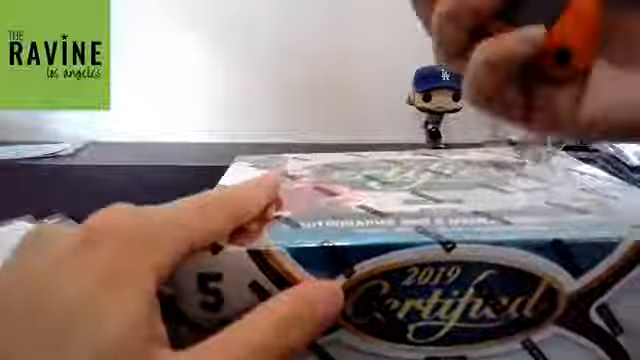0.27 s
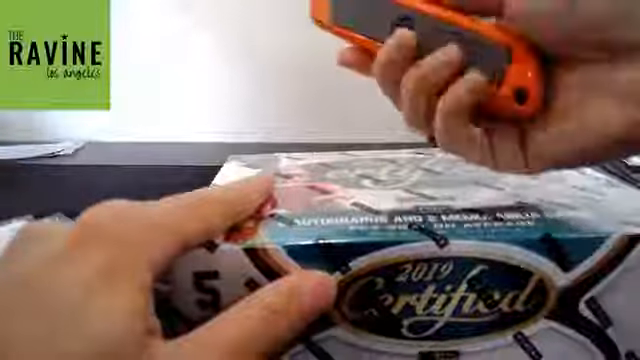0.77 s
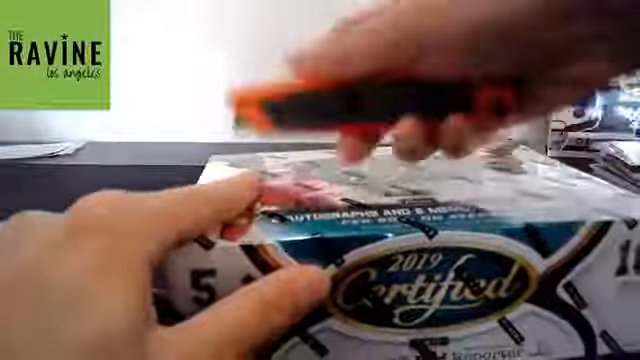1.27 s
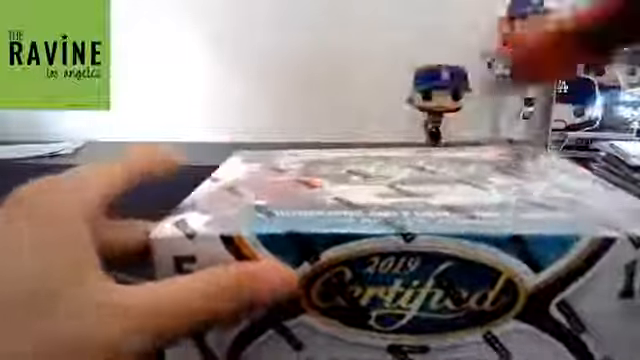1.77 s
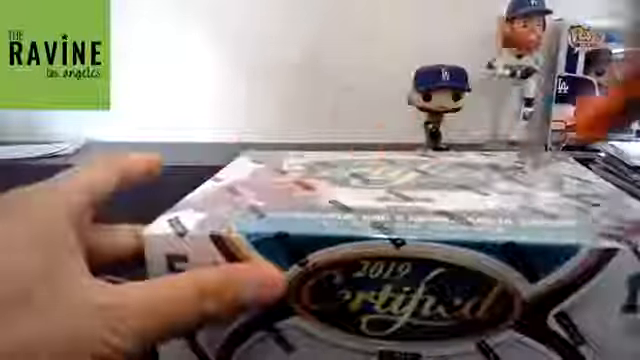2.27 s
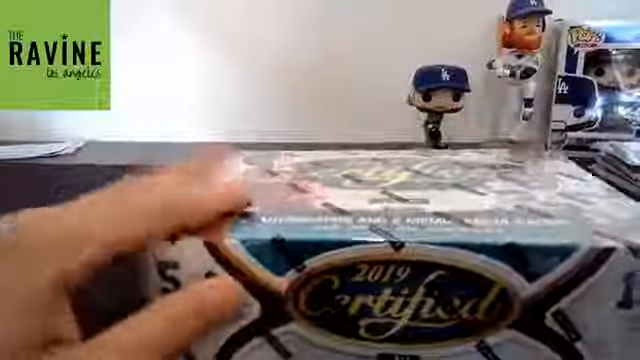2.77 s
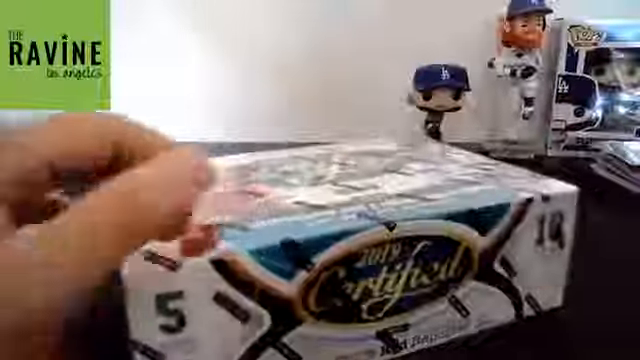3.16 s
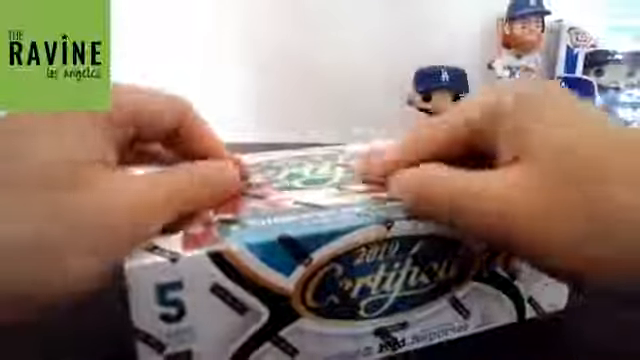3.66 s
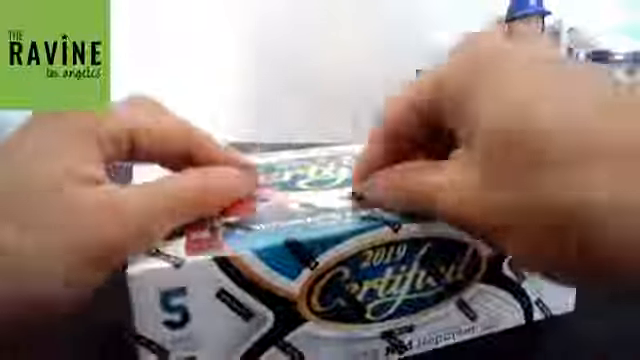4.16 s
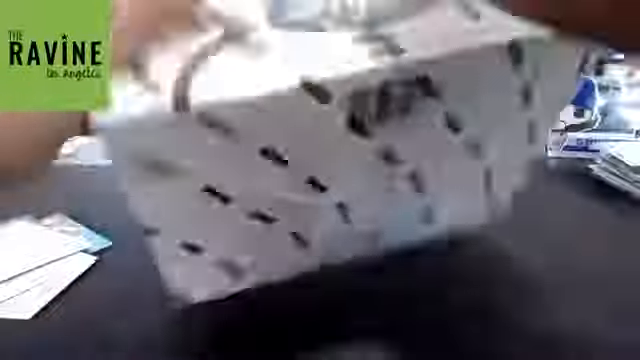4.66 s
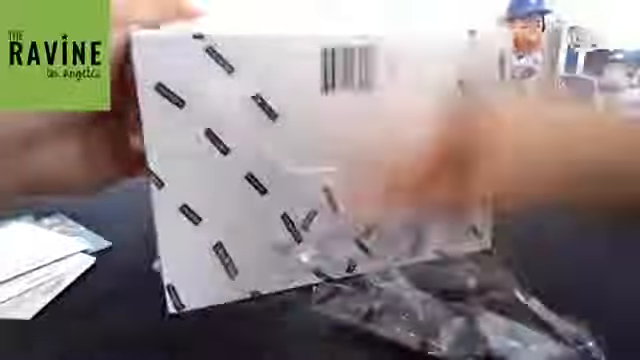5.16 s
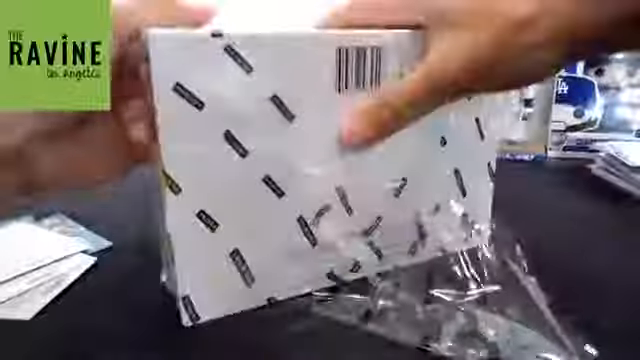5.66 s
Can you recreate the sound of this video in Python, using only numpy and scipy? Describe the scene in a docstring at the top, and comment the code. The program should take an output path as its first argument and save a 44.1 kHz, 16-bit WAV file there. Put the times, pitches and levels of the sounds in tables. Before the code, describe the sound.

Close microphone, small reflective room with very quiet room tone. Bright ratchety knife clicks come first, then two gritty cutting rasps, the second brighter and ending in a hard knock. After the closing clicks come a hollow box thump, squeaky sliding, fine plastic crackle, a sharp film snap, then sparse bumps, brushing skin and small crinkles.

```python
"""A utility knife is clicked open, drawn twice through the shrink film on a cardboard box and clicked shut:
noise flurries excite damped modes of the plastic, and random slips of the blade make the two rasps.
Fingers then slide the box on the desk, pick at the film, snap it and tip the box over: coloured grit,
friction noise, broad snaps and knocks on the modes of the box. A small lively room answers with decaying
noise, over room tone, faint tones of fixed pitch and one brief breathy whistle of resonant noise."""
import sys
import numpy as np
from scipy import signal
from scipy.fft import rfft, irfft, next_fast_len
from scipy.io import wavfile

SR = 44100
rng = np.random.default_rng(int(sys.argv[2]) if len(sys.argv) > 2 else 0)


def voltage_ratio(decibels):
    """Convert decibels (scalar or array-like) to amplitude ratios, 20 dB per decade."""
    exponent = np.asarray(decibels, float) / 20
    return 10 ** exponent


def bounce(signal):
    """Save signal as a 16-bit WAV file at the path given by the first command-line argument."""
    frames = np.transpose(np.atleast_2d(signal))
    limited = np.clip(frames, -1, 1)
    pcm = np.round(limited * 32767).astype(np.int16)
    wavfile.write(sys.argv[1], SR, pcm)


N = 261513   # samples

# Sharp clicks in the knife's plastic voice, mostly from its slider: start_s, peak_db
KNIFE_CLICKS = [(0.008, -58), (0.0549, -46.5), (0.142, -60), (0.2006, -49), (0.2495, -19.5), (0.362, -40),
                (0.3772, -39), (0.808, -68), (0.856, -43), (0.8655, -46.5), (0.878, -64), (0.9456, -28),
                (1.084, -50.5), (1.725, -47.5), (2.3842, -26), (2.419, -29.5)]
# Modes of the plastic knife: pitch_hz, gain_db
KNIFE_MODES = [(1050, -19), (2400, -1), (3400, 7.5), (4700, 9), (7800, 7.5), (10000, -2), (13500, -34)]
# Blade pressure through film and over card, one table a stroke: time_s, level_db
CUT_STROKES = [
    [(1.35, -84), (1.43, -53), (1.49, -50.5), (1.505, -38), (1.61, -41), (1.635, -69), (1.68, -59)],
    [(1.97, -80), (2.02, -53.5), (2.065, -38.5), (2.215, -42), (2.225, -51), (2.27, -78)],
]
# Relative colour of the blade's rasp: frequency_hz, gain_db
RASP_COLOUR = [(150, -7), (280, -14.5), (480, -0.5), (662, -5), (875, 6), (1020, -1.5), (1240, 4),
               (1700, 1), (2910, -4), (5730, -14.5), (6360, -12), (16000, -38)]
# Spectral tilt of the rasp: dull as the blade bites, brighter as it gathers speed
BITE_TILT_DB_PER_OCTAVE, TILT_RISE_DB_PER_OCTAVE_PER_S = -11.5, 80.5
# Tilt at full speed, one value a stroke, the second being the faster: tilt_db_per_octave
FULL_SPEED_TILT = [-0.43, 2.5]
RAGGED_DB = 2.5   # spread of each octave's own wavering

# Snaps of the film: start_s, peak_db, centre_hz
FILM_SNAPS = [(1.3379, -40, 1670), (1.4238, -41, 1700), (1.9599, -38.5, 1440), (2.006, -53, 1200),
              (2.7795, -46.5, 3130), (2.9524, -42, 6600), (3.3478, -43, 2480), (3.3873, -39, 10300),
              (3.4104, -32.5, 10500), (3.489, -36.5, 1920), (3.5015, -38, 3240), (3.7898, -43.5, 7000),
              (3.956, -44, 4150), (3.9763, -34, 5500), (4.2864, -17.5, 4130), (4.4584, -39, 1960),
              (4.5196, -48, 1750), (4.555, -41.5, 1620), (4.6103, -32.5, 3500), (4.6586, -47, 1500),
              (4.745, -47, 2500), (4.815, -39.5, 8150), (4.9155, -38.5, 4000), (5.0569, -42, 2650),
              (5.295, -33, 2080), (5.44, -53.5, 6000), (5.5225, -45.5, 1650), (5.7853, -46, 2820)]
# Fingers tugging the film: start_s, held_s, gain_db
FILM_TUGS = [(2.62, 0.19, -70), (3.42, 0.32, -75), (3.79, 0.036, -58.5), (3.98, 0.047, -59.5),
             (4.3, 0.021, -55), (4.5, 0.38, -72.5), (4.83, 0.13, -64), (5.02, 0.16, -75), (5.3, 0.11, -68),
             (5.63, 0.015, -68.5), (5.76, 0.036, -73.5), (5.88, 0.026, -75.5)]
TUG_RISE_DB_PER_S, TUG_FALL_DB_PER_S = 900, 95
# Relative colour of the film's crackle: frequency_hz, gain_db
FILM_COLOUR = [(1470, -13), (2500, 1.5), (2720, 1), (5350, -3), (8530, 3), (13200, -11.5), (16000, -13.5)]
CREASES_PER_S, CREASES_DB = 60, -0.5   # mean rate for each fold size; level against the fine crackle
# Hands gripping and shifting the box, with its rumble on the desk: start_s, held_s, rumble_db
HAND_GRIPS = [(2.55, 0.5, -67.5), (3.25, .65, -67), (4.1, 0.035, -56.5), (4.5, 0.05, -55.5),
              (4.76, .04, -73), (5.01, .05, -55), (5.38, .04, -57.5), (5.68, 0.079, -69)]
GRIP_RISE_DB_PER_S, GRIP_FALL_DB_PER_S = 92, 86
# Relative colour of skin brushing card: frequency_hz, gain_db
SKIN_COLOUR = [(350, -18.5), (750, -3.5), (1400, -12), (2500, -11), (4500, -25.5)]
# Skin level at a firm grip, the share of the grip's swing in dB it follows, and that grip's rumble level
SKIN_DB, SKIN_FOLLOWS, FIRM_GRIP_DB = -66, 0.43, -59.5

# Pushes of the film-wrapped box over the desk: start_s, held_s, level_db
BOX_PUSHES = [(2.62, 0.02, -58.5), (2.8, 0.21, -69.5), (3.23, 0.38, -66), (3.55, 0.073, -66)]
PUSH_RISE_DB_PER_S, PUSH_FALL_DB_PER_S = 287.5, 102
# Bands in which sliding friction sings: centre_hz, width_hz, level_db
SLIDE_BANDS = [(2340, 1400, -4), (3240, 980, 3.5), (4920, 980, -1.5), (6600, 1200, -6.5), (8750, 1500, -7)]
# Knocks on the box, with the pitch the struck spot favours: start_s, peak_db, pitch_hz, contact_ms
BOX_KNOCKS = [(1.341, -39.5, 470, 1.63), (1.424, -40.5, 493, 1.25), (1.961, -34, 506, 2.2),
              (2.195, -20, 505, 0.84), (2.949, -17.5, 334, 0.93), (2.953, -24, 159, 2.54),
              (2.958, -26, 496, 1.26), (3.19, -43, 220, 6), (3.347, -41.5, 245, 1.1),
              (3.492, -29, 220, 3.67), (4.073, -38, 132, 4.5), (4.287, -23.5, 295, 2.36),
              (4.493, -28.5, 390, 0.31), (4.719, -43.5, 302, 2.8), (4.743, -46.5, 300, 3.5),
              (4.762, -40, 190, 4), (4.914, -35.5, 436, 2.7), (4.992, -36.5, 233, 2.9),
              (5.012, -35, 216, 5.3), (5.293, -45, 710, 1.9), (5.358, -47, 262, 7.2), (5.4, -42, 132, 4),
              (5.519, -44.5, 405, 1)]
# Modes of the box: pitch_hz, gain_db
BOX_MODES = [(105, 8.5), (135, -1.5), (168, 1), (195, -2.5), (228, -0.5), (269, -2), (307, 9), (436, 16.5),
             (500, 12), (600, 8.5), (700, 17.5), (870, -4), (1250, -15)]

# One faint, breathy whistle: start_s, held_s, level_db
WHISTLE_BREATH = [(0.52, 0.049, -76)]
WHISTLE_HZ = 1650
# Reverberation time of the room: frequency_hz, t60_s
ROOM_DECAY = [(100, 0.41), (500, 0.57), (1500, 0.44), (4000, 0.69), (12000, 0.44)]
# Echo energy of the room: frequency_hz, energy_db
ROOM_ECHO = [(100, -6.5), (500, -2.5), (1500, -4), (4000, -5.5), (12000, -7)]
# Relative colour of the room tone: frequency_hz, gain_db
AIR_COLOUR = [(15, -74), (25, -18.5), (200, -11.5), (394, -18.5), (451, -11.5), (489, -23), (1260, -23),
              (16000, -45)]
AIR_DB = -74
# Faint background tones, levels before a common lift: pitch_hz, level_db
FAINT_TONES = [(1292, -89.5), (1577, -87), (2832, -89)]


def knife(hit):
    """Modal radiation: well-damped plastic modes ring, but so small a body gives no bass."""
    modes = 0
    for k, (hz, db) in enumerate(KNIFE_MODES):
        modes = modes + (-1) ** k * voltage_ratio(db) * ring(hit, hz, 2.8 / hz)
    return signal.sosfilt(signal.butter(2, 1300, "high", fs=SR, output="sos"), modes)


def cuts():
    """Stick-slip: the blade stutters through film and card; speed tilts the rasp to the treble."""
    rasp = colour(grit(5000, spread_db=3.0, clump_db=1.6, clump_rate=16.7), RASP_COLOUR)
    tilts = []
    for stroke, full_tilt in zip(CUT_STROKES, FULL_SPEED_TILT):
        since_bite = np.maximum(np.arange(N) / SR - stroke[0][0], 0)
        tilt = BITE_TILT_DB_PER_OCTAVE + TILT_RISE_DB_PER_OCTAVE_PER_S * since_bite
        tilts.append(np.minimum(tilt, full_tilt))
    out = 0
    for k, hz in enumerate(250 * 2. ** np.arange(7)):
        octave = band_pass(rasp, hz / 2 ** .5, hz * 2 ** .5, order=2)
        octaves_up = np.log2(hz / 1000)
        gain = sum(voltage_ratio(in_time(stroke) + tilt * octaves_up) for stroke, tilt in zip(CUT_STROKES, tilts))
        # alternating signs join neighbouring octaves without a gap
        out = out + (-1) ** k * gain * voltage_ratio(RAGGED_DB * drift(32)) * octave
    return out


def crease(hit, hz):
    """Snap-through: a flipping crease is broad about a centre set by fold size, with little far above."""
    broad = band_pass(hit, hz / 14.0, hz * 1.92, order=1)
    broad = signal.sosfilt(signal.butter(1, min(hz * 4.0, .45 * SR), fs=SR, output="sos"), broad)
    return broad + voltage_ratio(-21.5) * ring(hit, hz, 3.2 / hz)


def creases():
    """Random snap-through: lone folds of five sizes pop, each a short ragged flurry."""
    t = np.arange(256) / SR
    out = 0
    for hz in np.geomspace(1800, 9000, 5):
        flurry = rng.standard_normal(256) * np.exp(-t / 0.0026)
        moments = grit(CREASES_PER_S, spread_db=3.0, clump_db=4.0, clump_rate=14)
        pops = signal.fftconvolve(moments, flurry)[:N]
        out = out + rms_one(crease(pops, hz))
    return rms_one(out)


def hands():
    """Granular friction: film crackles finely, skin brushes the card, and the box drags on the desk."""
    tug = gestures(FILM_TUGS, TUG_RISE_DB_PER_S, TUG_FALL_DB_PER_S)
    film = colour(grit(3000, spread_db=2.0, clump_db=0.5, clump_rate=37), FILM_COLOUR)
    film = film + voltage_ratio(CREASES_DB) * creases()
    grip = gestures(HAND_GRIPS, GRIP_RISE_DB_PER_S, GRIP_FALL_DB_PER_S)
    skin = colour(grit(1500, spread_db=3.0, clump_db=5.0, clump_rate=18), SKIN_COLOUR)
    brush = voltage_ratio(SKIN_DB) * (grip / voltage_ratio(FIRM_GRIP_DB)) ** SKIN_FOLLOWS
    drag = grit(1500, spread_db=2.0, clump_db=3.5, clump_rate=42)
    desk = rms_one(box(drag, 228, spread_db=1.0))
    return tug * film + brush * skin + grip * desk


def slide():
    """Friction-driven resonance: smooth rubbing noise sings in a few steady bands."""
    rub = rng.standard_normal(N) * voltage_ratio(1.5 * drift(15))
    bands = 0
    for hz, width_hz, db in SLIDE_BANDS:
        t60 = np.log(1000) / np.pi / width_hz
        bands = bands + voltage_ratio(db) * rms_one(ring(ring(rub, hz, t60), hz, t60))
    return gestures(BOX_PUSHES, PUSH_RISE_DB_PER_S, PUSH_FALL_DB_PER_S) * rms_one(bands)


def knocks():
    """Contact time: a hard blow is one short push; a soft one is a rough push spread over its contact."""
    out = np.zeros(N + SR)
    for s, peak_db, spot_hz, contact_ms in BOX_KNOCKS:
        t = np.arange(SR // 4) / SR / (contact_ms / 1000)   # in contact times
        push = 0.83 * (t < 1) / contact_ms
        blow = t * np.exp(-t) * (rng.standard_normal(len(t)) + push)
        wide = 1 + 2.16 / contact_ms   # a soft push stirs only the panels near its own pitch
        blow = band_pass(blow, spot_hz / wide, spot_hz * wide, order=1)
        knock = box(blow, spot_hz, spread_db=0.5)
        at = round(s * SR)
        out[at:at + len(t)] += voltage_ratio(peak_db) * knock / np.abs(knock).max()
    return out[:N]


def box(x, spot_hz, spread_db):
    """Modal excitation: modes near the struck spot's pitch are favoured; higher modes die sooner."""
    out = 0
    for hz, db in BOX_MODES:
        off_spot_db = -9.1 * np.log2(hz / spot_hz) ** 2
        gain = voltage_ratio(db + off_spot_db + rng.normal(0, spread_db))
        out = out + gain * ring(x, hz, 0.63 / np.sqrt(hz))
    return out


def cracks(events, body, length_ms):
    """Direct and diffuse sound: a crack is a ragged flurry nearby; the walls get its mean colour."""
    t = np.arange(2048) / SR / (length_ms / 1000)
    near, far = np.zeros((2, N + len(t)))
    for s, peak_db, *pitch in events:
        flurry = body(rng.standard_normal(len(t)) * np.sqrt(t) * np.exp(-1.5 * t), *pitch)
        mean = body(1. * (t == 0), *pitch)   # response to a unit click
        gain = voltage_ratio(peak_db) / np.abs(flurry).max()
        at = round(s * SR)
        near[at:at + len(t)] += gain * flurry
        far[at:at + len(t)] += gain * mean * np.std(flurry) / np.std(mean)
    return np.array([near[:N], far[:N]])


def whistle():
    """Resonant filtering: noise passed twice through a narrow resonance gives a breathy pitch."""
    tone = ring(ring(rng.standard_normal(N), WHISTLE_HZ, 0.0087), WHISTLE_HZ, 0.0087)
    return gestures(WHISTLE_BREATH, rise_db_per_s=304, fall_db_per_s=150) * rms_one(tone)


def room(x):
    """Reverberation: echoes build up over the first wall distances, then each octave decays at its rate."""
    t = np.arange(SR) / SR
    tail = 0
    for hz in 90 * 2. ** np.arange(8):
        octave = band_pass(rng.standard_normal(SR), hz / 2 ** .5, hz * 2 ** .5, order=2)
        build_up = np.clip(t / 0.0043, 0, 1)
        octave = octave * voltage_ratio(-60 * t / at_hz(ROOM_DECAY, hz)) * build_up
        share = np.sqrt(hz * np.sqrt(2) / SR / SR)   # scales by the octave's nominal width
        tail = tail + voltage_ratio(at_hz(ROOM_ECHO, hz)) * rms_one(octave) * share
    return signal.fftconvolve(x, tail)[:N]


def air():
    """Stationary background: coloured noise with faint tones, fixed in pitch and wavering in level."""
    t = np.arange(N) / SR
    tones = 0
    for hz, db in FAINT_TONES:
        tones = tones + voltage_ratio(db + 1.5 + 1.8 * drift(5.6)) * np.sin(2 * np.pi * hz * t)
    return voltage_ratio(AIR_DB) * colour(rng.standard_normal(N), AIR_COLOUR) + tones


def ring(x, hz, t60):
    """Damped resonance: a unit click sets a sine of height 1 ringing; t60 in s."""
    r, w = voltage_ratio(-60 / (t60 * SR)), 2 * np.pi * hz / SR
    return signal.lfilter([0, np.sin(w)], [1, -2 * r * np.cos(w), r * r], x + 1e-18)


def grit(per_s, spread_db, clump_db, clump_rate):
    """Random impulses: tiny slips of very uneven size, coming in clumps."""
    sizes = voltage_ratio(spread_db * np.minimum(rng.exponential(1, N), 5)) * rng.choice([-1, 1], N)
    slips = rng.random(N) < per_s / SR
    return sizes * slips * voltage_ratio(clump_db * drift(clump_rate))


def drift(rate):
    """Low-passed noise: slow chance of rms 1 over its whole run; corner rate in Hz."""
    r = np.exp(-2 * np.pi * rate / SR)
    noise = rng.standard_normal(N + SR)
    return rms_one(signal.lfilter([1], [1, -2 * r, r * r], noise)[SR:])   # first second settles


def gestures(rows, rise_db_per_s, fall_db_per_s):
    """Exponential envelope: each movement swells up to its time, holds, and dies away."""
    t = np.arange(N) / SR
    gain = 0
    for s, held, db in rows:
        rise = rise_db_per_s * np.maximum(s - t, 0)
        fall = fall_db_per_s * np.maximum(t - s - held, 0)
        gain = gain + voltage_ratio(db - rise - fall)
    return gain


def in_time(rows):
    """Level interpolation: a dB curve at every sample, practically silent outside it."""
    s, db = np.transpose(rows)
    return np.interp(np.arange(N) / SR, s, db, left=-140, right=-140)


def band_pass(x, low_hz, high_hz, order):
    """Band limiting: pass a range of frequencies, its upper edge kept below the Nyquist limit."""
    edges = [low_hz, min(high_hz, .45 * SR)]
    return signal.sosfilt(signal.butter(order, edges, "band", fs=SR, output="sos"), x)


def at_hz(points, hz):
    """Spectral interpolation: read a spectrum on a log-frequency axis."""
    point_hz, value = np.transpose(points)
    return np.interp(np.log(hz + 1), np.log(point_hz), value)


def colour(x, spectrum):
    """Spectral shaping: weight the frequencies of a steady sound and scale it to rms 1."""
    size = next_fast_len(len(x))
    gain = voltage_ratio(at_hz(spectrum, np.fft.rfftfreq(size, 1 / SR)))
    return rms_one(irfft(rfft(x, size) * gain, size)[:len(x)])


def rms_one(x):
    """Power normalisation: scale to rms 1."""
    return x / np.sqrt(np.mean(x ** 2) + 1e-20)


def scene():
    """Superposition: the sources at the desk, their echoes, the room tone and the whistle add."""
    clicks = cracks(KNIFE_CLICKS, knife, length_ms=3.23)
    snaps = cracks(FILM_SNAPS, crease, length_ms=3.7)
    near, far = clicks + snaps
    rest = cuts() + hands() + slide() + knocks()
    no_bass = signal.butter(6, 105, "high", fs=SR, output="sos")   # small things radiate no deep bass
    desk = signal.sosfilt(no_bass, near + rest + room(far + rest))
    return (desk + air() + whistle())[None]


def roll_off(x):
    """The treble ends steeply here."""
    return signal.sosfilt(signal.butter(12, 16500, fs=SR, output="sos"), x)


def record(dry):
    """Microphone response: a dip and then a lift in the treble."""
    dip = signal.lfilter(*signal.iirpeak(5500, 6.0, SR), dry)
    lift = signal.lfilter(*signal.iirpeak(6400, 7.0, SR), dry)
    heard = dry - 0.45 * dip + 0.28 * lift
    return roll_off(heard)


dry = scene()
out = record(dry)
bounce(out)
```